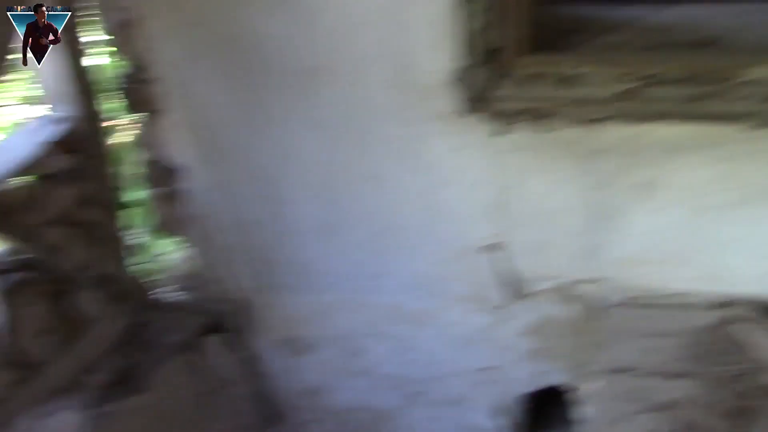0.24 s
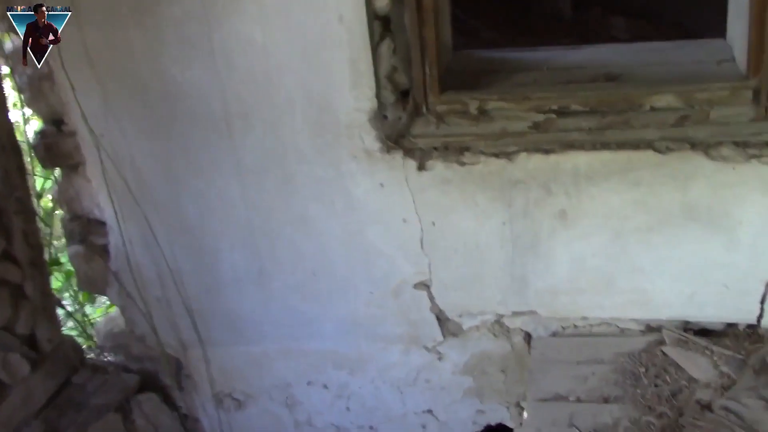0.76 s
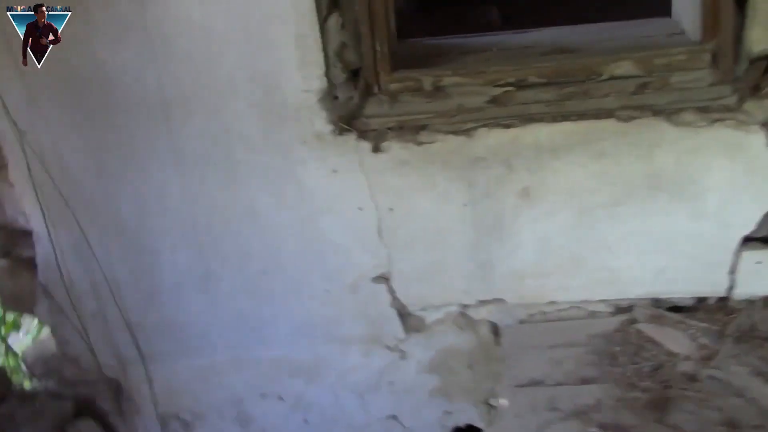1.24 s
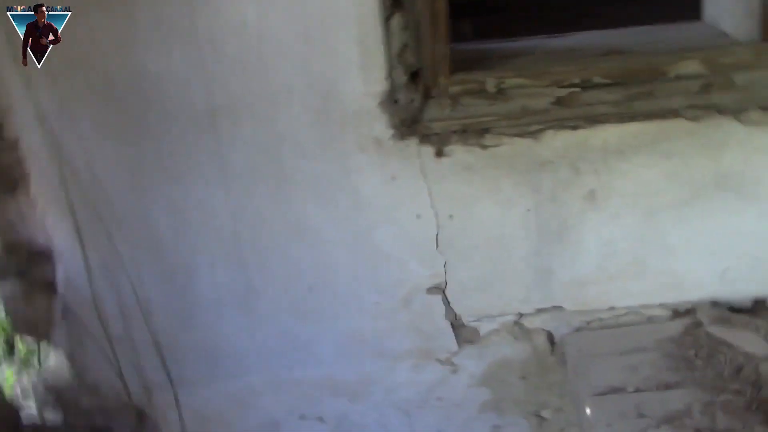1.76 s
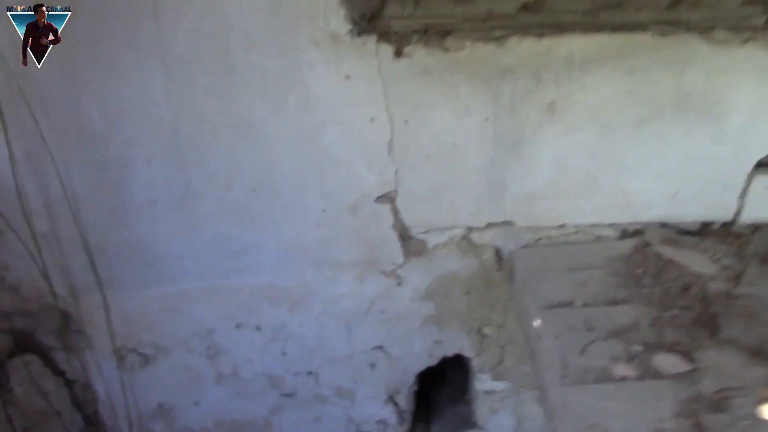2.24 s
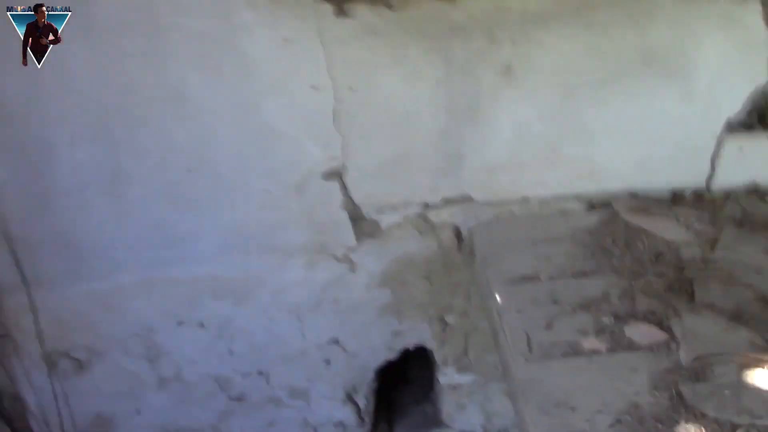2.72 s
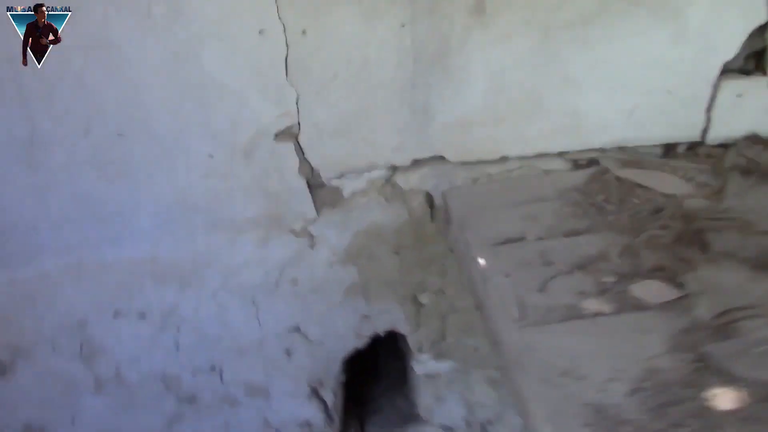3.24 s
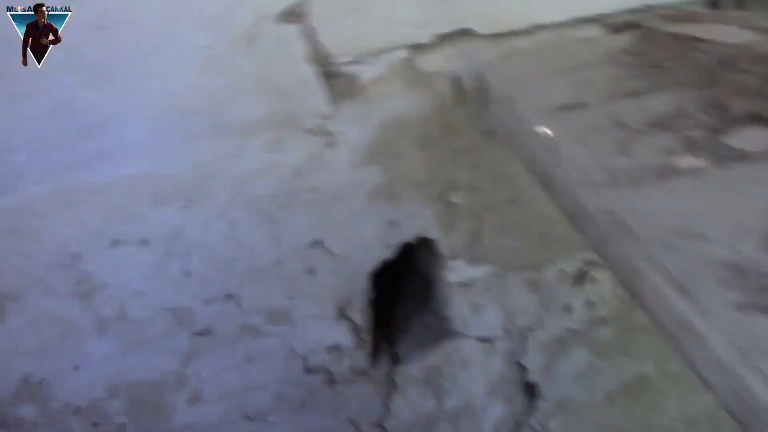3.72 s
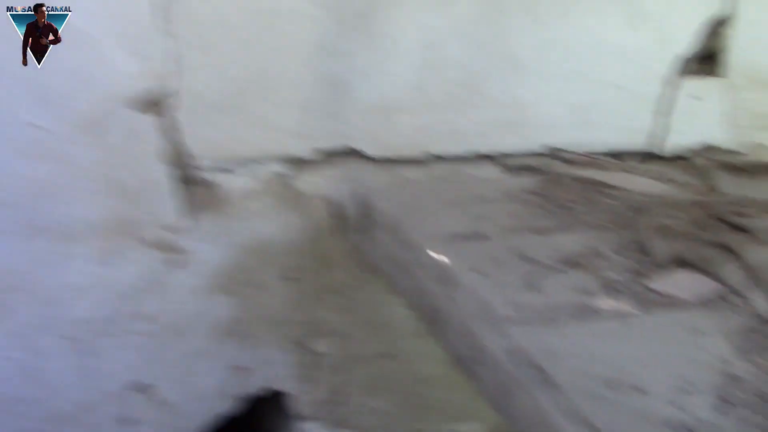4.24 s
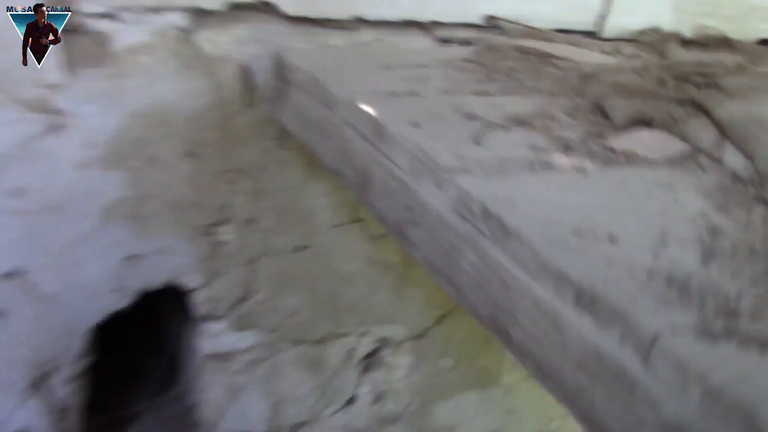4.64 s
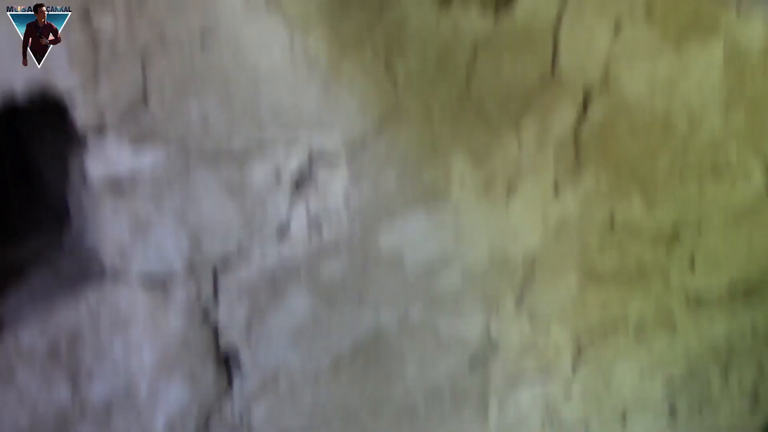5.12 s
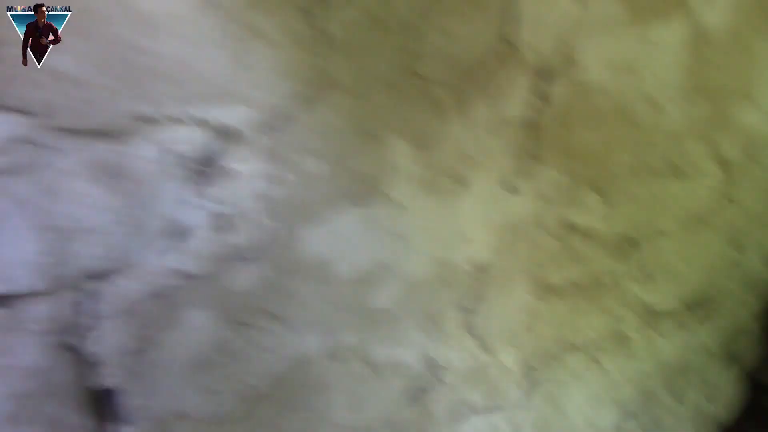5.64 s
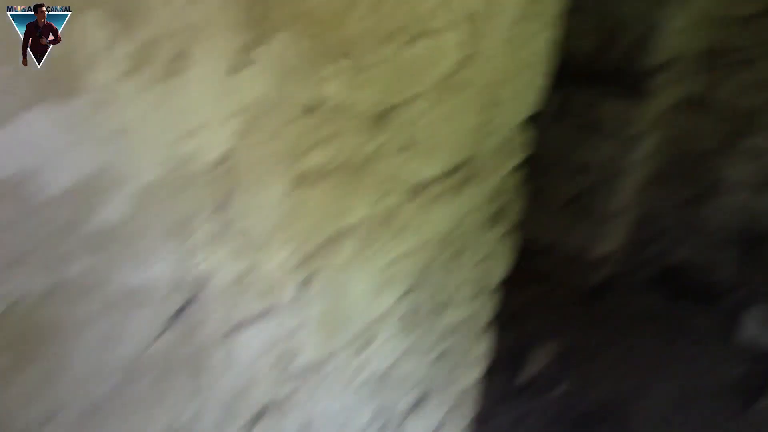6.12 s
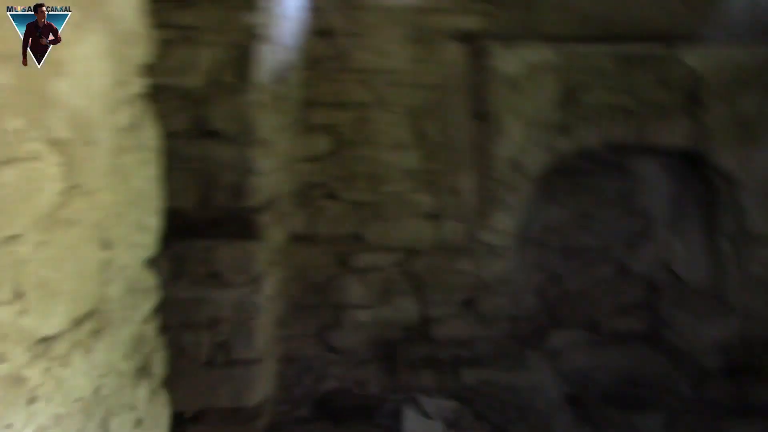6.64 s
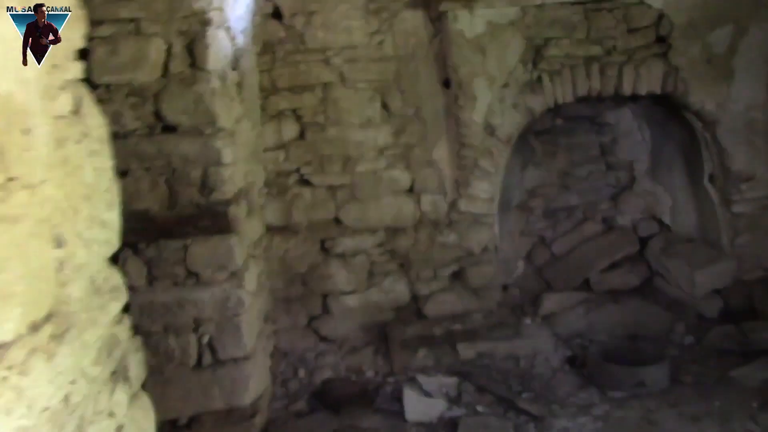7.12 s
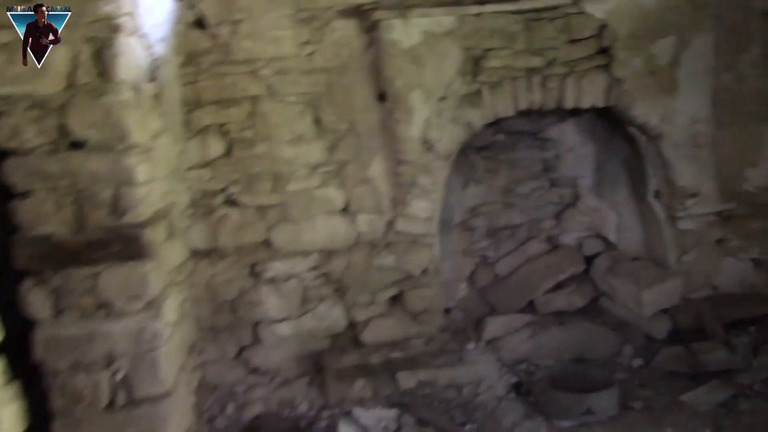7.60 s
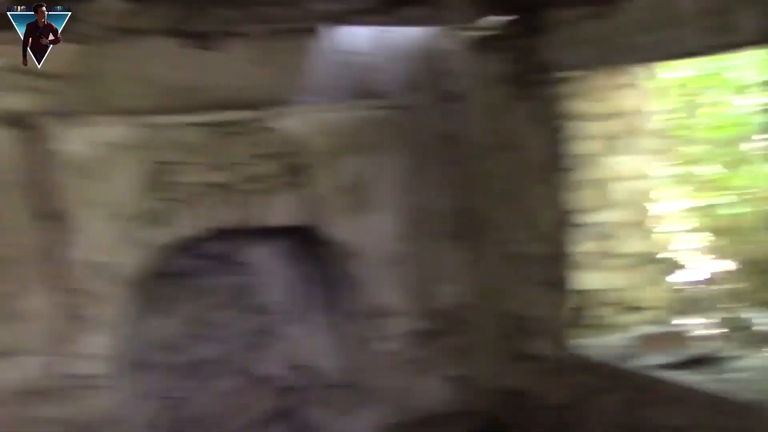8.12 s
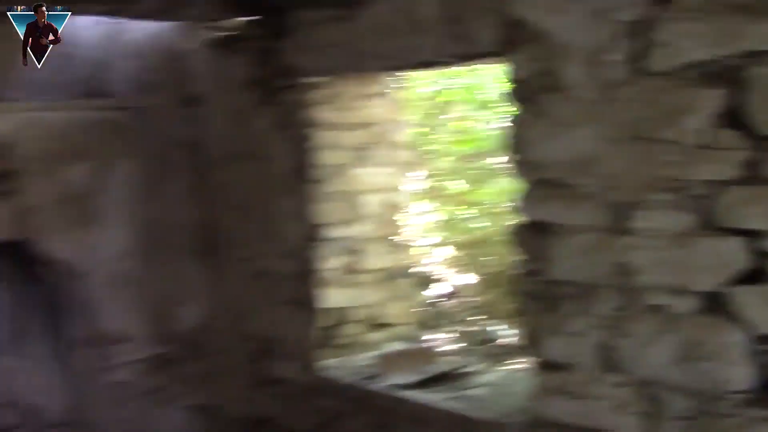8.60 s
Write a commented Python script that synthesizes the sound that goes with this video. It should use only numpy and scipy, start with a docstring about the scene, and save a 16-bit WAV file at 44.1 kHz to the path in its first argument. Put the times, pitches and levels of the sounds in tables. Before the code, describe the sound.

Close, handheld listening as one person walks slowly over rubble in a bare stone ruin. Gritty scuffs and stone knocks come first, then a slab grates in ringing jerks around two seconds. A hard clatter follows at three, faint squeaks fill a quieter middle, and heavy steps with sharp clicks land around six. Later movements are sparser, with a tiny creak. Soft outdoor hush and short echo throughout.

```python
"""Inside a roofless stone house, someone walks slowly over rubble, under a soft outdoor hush.
Soles scuff through grit (clouds of damped grains), and chips click (noise bursts through resonances).
Heels knock on loose stones (decaying modes with a burst of crushed grit) and thump the packed ground.
A slab is dragged in jerks and rings, shards squeak as gliding tones, and something creaks once by stick-slip.
Bare walls answer with a short decaying echo."""
import sys
import numpy as np
from scipy import signal
from scipy.fft import rfft, irfft, next_fast_len
from scipy.io import wavfile
from scipy.ndimage import uniform_filter1d, map_coordinates

SR = 44100
rng = np.random.default_rng(int(sys.argv[2]) if len(sys.argv) > 2 else 0)


def output_pcm(signal):
    """Save a mono or channel-first signal as 16-bit PCM at the path in sys.argv[1].

    Samples are clipped to [-1, 1] before scaling.
    """
    pcm = np.clip(np.atleast_2d(signal).T, -1, 1) * 32767
    wavfile.write(sys.argv[1], SR, np.round(pcm).astype(np.int16))


N = 390989  # samples


def amp(db):
    """The decibel law: a level in dB as an amplitude ratio."""
    return 10 ** (np.asarray(db) / 20)


def unit(x):
    """Normalization to a root-mean-square value of 1."""
    return x / np.sqrt(np.mean(x ** 2) + 1e-20)


def along(points, hz):
    """Interpolation of (frequency_hz, value) points on a logarithmic frequency axis."""
    f, v = np.transpose(points)
    return np.interp(np.log(hz + 1), np.log(f + 1), v)


def wobble(rate):
    """Slow random modulation: a smooth curve through `rate` random knots a second."""
    knots = rng.standard_normal(int(N * rate / SR) + 4)
    return map_coordinates(knots, [np.arange(N) * rate / SR])


def filtered(x, response):
    """Linear filtering: the spectrum of x times a (complex) response of frequency."""
    m = next_fast_len(N + SR // 2)  # room for ringing, so the end does not wrap to the start
    spectrum = rfft(x, m) * response(np.fft.rfftfreq(m, 1 / SR))
    return irfft(spectrum, m)[..., :N]


def without_bass(x, corner_hz):
    """Weak low-frequency radiation: three first-order high-pass stages."""
    return filtered(x, lambda hz: (1j * hz / (corner_hz + 1j * hz)) ** 3)


def body(modes):
    """Modal superposition: the causal response of a few resonances of alternating sign."""
    def response(f):
        total = 0
        for k, (centre, width, db) in enumerate(modes):
            resonance = 1j * f * width / (centre * centre - f * f + 1j * f * width)
            total = total + (-1) ** k * amp(db) * resonance
        return total
    return response


def hush():
    """Partial coherence of a diffuse field: distant air and leaves, partly unlike on the two sides."""
    # spectrum of the hush: frequency_hz, relative level_db (per Hz)
    spectrum = [(25, -20), (84, -7.5), (161, -6), (263, -2.5), (317, -4.5), (3250, -21), (8830, -31.5),
                (16000, -44)]
    # likeness of left and right: frequency_hz, correlation (1 = the same)
    likeness = [(60, 1), (950, 0.69), (3770, 0.76), (15000, 1.0)]
    level_db = -55.5

    def turn(hz):
        return np.arccos(np.clip(along(likeness, hz), -1, 1)) / 2

    def mid_side(hz):
        return amp(along(spectrum, hz)) * [np.cos(turn(hz)), np.sin(turn(hz))]

    mid, side = filtered(rng.standard_normal((2, N)), mid_side)
    sway_db = 1.3 * wobble(3.5)
    return amp(level_db + sway_db) * unit(np.array([mid + side, mid - side]))


def grains(hz, spread, cycles, spiky_db, count, size):
    """Granular superposition: stones touch at random moments, each a damped sine of its own pitch."""
    when, big = rng.random((2, count, 1))
    f = np.clip(hz * np.exp(spread * rng.standard_normal((count, 1))), 60, SR / 3)
    k = np.arange(size)
    turns = f * k / SR
    strength = amp(spiky_db * (2 * big - 1))
    damping = np.exp(-turns / cycles) * (1 - k / size)
    shape = strength * damping * np.sin(2 * np.pi * turns)
    places = (when * N).astype(int) + k
    return unit(np.bincount(places.ravel(), shape.ravel(), N + size)[:N])


def patchy(x, depth_db):
    """Spectral fluctuation: random gain in patches of time and pitch shifts the colour of a hiss."""
    z = signal.stft(x, nperseg=256)[2]
    field = uniform_filter1d(rng.standard_normal(z.shape), size=12, axis=0)
    field = uniform_filter1d(field, size=8, axis=1)
    return unit(signal.istft(z * amp(depth_db * unit(field)), nperseg=256)[1][:N])


def pressure():
    """Energy addition: scuffs swell and fade, and their powers add into gains of stones, pebbles, sand."""
    # soles rolling and sliding on rubble: loudest_s, swell_s, fade_s, stones_db, sand_db
    soles = [(0.12, 0.042, 0.57, -48, -61.5), (0.34, 0.045, 0.089, -33, -39.5),
             (0.382, 0.068, 0.18, -25, -41), (0.535, 0.15, 0.11, -27, -88), (0.92, 0.044, 0.22, -52, -62),
             (1.3, 0.2, 0.14, -42.5, -63.5), (1.592, 0.1, 0.19, -37, -48), (1.66, 0.06, 0.098, -47, -41.5),
             (1.82, 0.11, 0.072, -44.5, -41), (1.864, 0.034, 0.027, -46, -35), (2.04, 0.16, 0.06, -38, -39),
             (2.081, 0.053, 0.21, -31, -41), (2.2, 0.24, 0.46, -34.5, -39.5),
             (2.36, 0.25, 0.064, -34.5, -54.5), (2.45, 0.093, 0.14, -32, -46),
             (2.82, 0.049, 0.093, -49, -44), (2.97, 0.46, 0.11, -38.5, -44.5),
             (3.17, 0.18, 0.11, -38.5, -51.5), (3.3, 0.018, 0.023, -22, -41),
             (3.46, 0.18, 0.27, -38.5, -47), (3.55, 0.12, 0.11, -38, -47), (3.621, 0.02, 0.014, -52, -32),
             (3.72, 0.18, 0.16, -45.5, -49.5), (3.95, 0.17, 0.071, -52.5, -48),
             (4.12, 0.23, 0.18, -41.5, -52.5), (4.3, 0.25, 0.13, -41, -55), (4.92, 0.23, 0.19, -38, -64),
             (4.97, 0.12, 0.58, -52.5, -53.5), (5.345, 0.012, 0.12, -44.5, -48),
             (5.47, 0.03, 0.11, -42.5, -54.5), (5.63, 0.076, 0.52, -41, -59),
             (5.77, 0.21, 0.036, -38.5, -60.5), (6.02, 0.082, 0.076, -39, -67),
             (6.48, 0.089, 0.093, -29.5, -57), (6.534, 0.031, 0.038, -33, -41),
             (6.68, 0.22, 0.22, -43.5, -64), (6.92, 0.11, 0.17, -53.5, -57), (7.15, 0.095, 0.8, -45.5, -62),
             (7.61, 0.089, 0.13, -56, -61.5), (7.89, 0.093, 0.18, -42, -53.5),
             (8.68, 0.13, 0.19, -48.5, -68), (8.86, 0.12, 0.11, -46, -64)]
    # stirring that goes on between scuffs: level_db of stones, pebbles and sand
    stir_db = (-55.5, -66.5, -69.5)
    span_db = 20  # climb over one swell, or drop over one fade, before rounding
    rounding = 0.1  # share of swell and fade over which the top is rounded
    # pebbles lie this far from the stones' level towards the sand's, plus an offset in dB
    pebble_share, pebble_offset_db = 0.3, -4

    power = amp(stir_db)[:, None] ** 2 * np.ones(N)
    t = np.arange(N) / SR
    for s, swell, fade, stones_db, sand_db in soles:
        near = slice(max(round((s - 2 * swell) * SR), 0), round((s + 2 * fade) * SR))
        late = t[near] - s
        slope = np.maximum(-late / max(swell, .01), late / max(fade, .01))
        shape_db = -span_db * (np.hypot(slope, rounding) - rounding)
        pebbles_db = stones_db + pebble_share * (sand_db - stones_db) + pebble_offset_db
        levels_db = np.array([[stones_db], [pebbles_db], [sand_db]])
        power[:, near] += amp(shape_db + levels_db) ** 2
    return np.sqrt(power)


def scuffs():
    """Stick-slip over grains: big stones rumble, pebbles rattle and sand hisses, all in shared clumps."""
    # spectrum of the sand's hiss: frequency_hz, relative level_db (per Hz)
    sand_spectrum = [(1470, 4.5), (2500, 1), (3330, -1.5), (5690, 4), (6500, 1), (9580, -0.5), (13800, -3),
                     (16000, -13)]
    # patches of coarser or finer sand underfoot: from_s, to_s, change of the top octave_db
    patches = [(2.15, 2.903, -3.5), (4.05, 5.436, -13), (5.453, 5.656, 0), (5.688, 6.49, -0.5),
               (6.515, 6.6, 6)]

    catch_db = 2.2 * wobble(55)  # the sole catches and slips
    stones = grains(470, 0.565, cycles=2.26, spiky_db=3.5, count=5000, size=600)
    pebbles = grains(1995, 0.47, cycles=1.24, spiky_db=3.0, count=12000, size=200)
    specks = grains(6740, 0.52, cycles=5.7, spiky_db=6.5, count=9000, size=80)
    specks = rng.standard_normal(N) + 0.66 * specks
    sand = patchy(filtered(specks, lambda hz: amp(along(sand_spectrum, hz))), depth_db=3)

    fine_db = np.zeros(N)
    k = np.arange(N)
    for start, end, db in patches:
        fine_db += db * ((k > start * SR) & (k < end * SR))
    top = filtered(sand, lambda hz: 1 / (1 + (8000 / (hz + 1)) ** 6))
    sand = sand + top * (amp(uniform_filter1d(fine_db, size=900)) - 1)
    flickering_sand = amp(1.63 * wobble(60)) * sand
    return amp(catch_db) * (pressure() * [stones, pebbles, flickering_sand]).sum(0)


def chips():
    """Impulsive excitation: a sharp click and a short broad burst, strongest near the chip's pitch."""
    # chips of stone: start_s, peak level_db, pitch_hz
    snaps = [(0.1618, -32, 2200), (0.25, -35, 8000), (0.3042, -36, 5260), (0.609, -36, 1940),
             (0.709, -37, 8640), (0.758, -37, 2140), (1.79, -26, 5900), (2.075, -16, 9000),
             (2.6159, -34, 7160), (2.9763, -27, 3450), (3.1164, -23, 2130), (3.1485, -12, 2470),
             (3.282, -23.5, 2300), (3.308, -28, 2480), (4.771, -40, 2860), (5.625, -42.5, 1480),
             (5.9786, -15.5, 1810), (6.3464, -34.5, 2720), (6.431, -31, 4770), (6.483, -38, 2200),
             (6.501, -23, 1780), (6.5188, -9.5, 4900), (6.612, -21, 1700), (6.643, -31, 1700),
             (6.763, -33, 7030), (6.8042, -36, 7050), (6.9228, -32, 2310), (7.215, -32, 1700),
             (7.556, -35.5, 980), (7.8466, -29.5, 3930), (7.887, -27, 1630), (7.907, -30, 1900),
             (7.9443, -25, 1480), (8.0644, -24.5, 1330)]
    out, t = np.zeros(N + SR), np.arange(SR // 20) / SR
    decay = 0.15 * amp(-60 * t / 0.0028) + 0.063 * amp(-60 * t / 0.043)  # two 60 dB decay times, s
    for s, db, hz in snaps:
        force = rng.standard_normal(len(t)) * decay
        force[0] += .5  # the click
        peak = signal.iirpeak(hz, .8, SR)
        snap = signal.lfilter(*peak, signal.lfilter(*peak, force))
        out[round(s * SR):][:len(t)] += amp(db) * snap / np.abs(snap).max()
    return out[:N]


def knocks():
    """Modal impact: each blow rings a stone near its pitch and crushes grit in a dying burst."""
    # heel and stone knocks: start_s, peak level_db of the stone before the bass cut, pitch_hz,
    # crunch level_db (relative to the blow)
    blows = [(0.372, -30.5, 990, 11.5), (0.398, -19.5, 472, 2.5), (0.513, -16, 699, 2.5),
             (0.659, -27, 453, -8), (0.798, -36, 450, -1), (0.873, -30.5, 465, -10),
             (1.186, -17.5, 300, -14), (2.072, -20, 604, -7), (2.388, -15, 402, -14),
             (2.394, -23.5, 1010, -15), (2.426, -26, 793, 0.5), (2.444, -21, 475, -3.5),
             (2.535, -25, 748, -7), (2.852, -26.5, 777, 0), (2.917, -27, 1064, -19),
             (3.149, -20.5, 596, 1.5), (3.274, -8.5, 267, -30), (3.277, -20, 549, -14),
             (3.291, -15.5, 330, -3.5), (4.0531, -13, 288, -28), (4.0545, -18, 560, -19),
             (4.785, -22.5, 312, -15), (5.416, -26, 422, -4), (5.537, -26, 297, -13),
             (5.702, -36, 550, 5.5), (5.736, -30.5, 580, 0), (5.977, -19, 593, -3),
             (6.4012, -11.5, 555, -7.5), (6.4025, -11, 201.6, -15), (6.5, -18, 429, -8),
             (6.519, -18.5, 523, -3.5), (6.615, -25, 478, 0.5), (7.095, -16.5, 327, -22.5),
             (7.1, -20.5, 537, -31), (7.226, -28.5, 740, -4.5), (7.811, -19.5, 565, -9.5),
             (8.61, -32.5, 343, -1), (8.682, -38, 398, -5.5)]
    # spectrum of crushed grit: frequency_hz, relative level_db (per Hz)
    crunch = [(150, 1), (400, 10.5), (1200, 4), (3000, -15), (7000, -50), (15000, -97)]
    ring_s, ring_falls = 0.072, 0.27  # 60 dB decay of a 400 Hz stone; power of pitch that shortens it
    attack_cycles = 0.15  # a blow builds up within a fraction of a cycle of its pitch

    stone, burst, t = np.zeros(N + SR), np.zeros(N + SR), np.arange(SR // 4) / SR
    for s, db, hz, crunch_db in blows:
        t60 = ring_s * (400 / hz) ** ring_falls
        fall = amp(db - 60 * t / t60) * (1 - np.exp(-t * hz / attack_cycles)) ** 2
        # the stone rocks on its bed: phases drift
        rock = 0.023 * np.cumsum(rng.standard_normal((13, len(t))), axis=1)
        ring = np.sin(2 * np.pi * hz * t + rock[0])
        # further modes, as multiples of the pitch; higher ones are weaker and die sooner
        ratio = np.exp(0.296 + .5 * rng.standard_normal((12, 1)))
        fade = amp(-60 * t * np.maximum(ratio - 1, 0) / t60) / np.maximum(ratio, 1)
        phase = 2 * np.pi * hz * ratio * t + rock[1:] + 2 * np.pi * rng.random((12, 1))
        ring += 0.35 * (fade * np.sin(phase)).sum(0)
        at = slice(round(s * SR), round(s * SR) + len(t))
        stone[at] += amp(db) * ring * fall / np.abs(ring * fall).max()
        burst[at] += amp(crunch_db) * fall
    grit = unit(filtered(rng.standard_normal(N), lambda hz: amp(along(crunch, hz))))
    return without_bass(stone[:N] + burst[:N] * grit, 140)  # small stones radiate little bass


def thuds():
    """Heavy damping: the heel's weight thumps packed ground, which gives softly and dies fast."""
    # thumps: start_s, level_db, pitch_hz
    thumps = [(1.19, -36, 150), (3.285, -23, 190), (4.056, -27.5, 158), (5.54, -21, 151), (5.646, -31, 124),
              (5.958, -34, 125), (5.979, -15.5, 119), (6.4007, -8, 163), (6.485, -17, 157),
              (6.519, -22.5, 153), (7.104, -23, 112)]
    # modes of the ground: ratio to the pitch, relative level_db, 60 dB decay time_s
    ground = [(1, 3, 0.052), (.62, -17.5, 0.17)]
    out, t = np.zeros(N + SR), np.arange(SR // 4) / SR
    onset = 1 - np.exp(-t / 0.0029)
    for s, db, hz in thumps:
        ring = np.zeros(len(t))
        for ratio, mode_db, t60 in ground:
            ring += amp(db + mode_db - 60 * t / t60) * np.sin(2 * np.pi * hz * ratio * t)
        out[round(s * SR):][:len(t)] += ring * onset
    return out[:N]


def slab():
    """Friction-driven resonance: gritty rubbing rings the slab jerk by jerk; its tilt shifts the modes."""
    # modes of the slab: frequency_hz, width_hz, relative level_db
    modes = [(447, 380, 3), (963, 27, 22), (1174, 180, 6), (2100, 840, -9), (5300, 230, -12.5),
             (7030, 170, -12)]
    # jerks of the sliding slab: start_s, length_s, level_db, pitch ratio of the modes
    jerks = [(2.01, 0.021, -40, 1.04), (2.087, 0.032, -30.5, 1.08), (2.115, 0.017, -23, 0.96),
             (2.148, 0.0067, -18, 1.014), (2.175, 0.055, -28, 1.07), (2.253, 0.024, -23, 0.98),
             (2.31, 0.037, -28, 0.98)]
    attack_s, release_s = 0.0034, 0.012
    t, out = np.arange(N) / SR, np.zeros(N)
    roughness_db = 1.9 * wobble(90) + 0.77 * rng.exponential(size=N)
    rub = amp(roughness_db) * rng.standard_normal(N)
    for s, length, db, tilt in jerks:
        rise = np.clip((t - s) / attack_s, 0, 1)
        grip = amp(db) * rise * np.exp(-np.maximum(t - s - length, 0) / release_s)
        out += grip * unit(filtered(rub, lambda hz: body(modes)(hz / tilt)))
    return out


def shard():
    """Single-mode friction: brief rubs sound a fluttering, slightly hoarse tone that glides."""
    # thin shards squeaking under the sole: start_s, length_s, level_db, first pitch_hz, last pitch_hz
    rubs = [(3.438, 0.17, -50, 2100, 2120), (4.115, 0.16, -55.5, 2650, 2580), (4.7, 0.11, -46, 1280, 1520),
            (5.1, 0.034, -46.5, 2700, 2640), (4.945, 0.045, -50, 2930, 3300),
            (5.025, 0.043, -52, 2850, 2800), (5.01, 0.072, -57.5, 4480, 4420),
            (5.345, 0.054, -59, 3500, 3500), (5.343, 0.049, -53, 3000, 2780),
            (2.44, 0.021, -32.5, 2180, 2090)]
    out, flutter = np.zeros(N), amp(3.5 * wobble(70))
    for s, length, db, from_hz, to_hz in rubs:
        t = np.arange(round(length * SR)) / SR
        hoarse = 0.11 * np.cumsum(rng.standard_normal(len(t)))  # phase drift, radians
        mean_hz = from_hz + (to_hz - from_hz) * t / length / 2  # mean pitch since the start
        squeak = np.sin(2 * np.pi * mean_hz * t + hoarse)
        ramps = np.clip(np.minimum(t, length - t) / 0.0029, 0, 1)
        out[round(s * SR):][:len(t)] += amp(db) * ramps * unit(squeak)
    return out * flutter


def creak():
    """Stick-slip: a short run of uneven slips drives stiff resonances, slowing as it grows louder."""
    # resonances of what creaks: frequency_hz, width_hz, relative level_db
    resonances = [(2200, 210, 4), (2630, 460, 5), (3500, 180, 4)]
    start_s, end_s = 7.48, 7.652
    t = np.arange(N) / SR
    db = np.interp(t, [start_s, end_s], [-54.5, -43.5])
    slips_per_s = np.interp(t, [start_s, end_s], [160, 62])
    uneven = 0.14 * wobble(80)
    slip_count = np.floor(np.cumsum(slips_per_s * (1 + uneven)) / SR)
    slips = np.diff(slip_count, prepend=0) * amp(2 * rng.standard_normal(N))
    sounding = (t > start_s) & (t < end_s)
    return amp(db) * unit(filtered(slips, body(resonances))) * sounding


def walls(x):
    """Reverberation: decaying noise as echo, alike on both sides in the bass; the treble dies first."""
    # difference between the sides in the echo: frequency_hz, side over mid level_db
    spread = [(200, -31), (1500, -15.5), (5000, -10), (14000, -20)]
    # decay of the echo: frequency_hz, 60 dB decay time_s
    decay = [(120, 0.34), (700, 0.16), (2500, 0.12), (10000, 0.088)]
    out, step = np.zeros((2, N + 2 * SR)), SR // 3
    # the walker moves, so each third of a second has an echo of its own
    for at in range(0, N, step):
        hz, t, z = signal.stft(rng.standard_normal((2, SR // 2)), SR, nperseg=256)
        z[1] *= amp(along(spread, hz))[:, None]
        fall = amp(-60 * t / along(decay, hz)[:, None])
        mid, side = signal.istft(z * fall, SR, nperseg=256)[1]
        tail = np.array([mid + side, mid - side]) / np.linalg.norm(mid)
        echo = signal.fftconvolve(x[None, at:at + step], tail, axes=1)
        out[:, at:at + echo.shape[1]] += echo
    return np.pad(out, ((0, 0), (200, 0)))[:, :N]  # the echo starts 200 samples late


def scene():
    """Superposition: contact sounds, their echo and the hush add at two close-set listening points."""
    rubbing = scuffs() + slab() + shard() + creak()
    feet = without_bass(rubbing, 150) + knocks() + thuds() + chips()
    feet = without_bass(feet, 66)  # rubble carries no deep bass
    # a slope added to one side and taken from the other is a tiny delay: contacts lie now left, now right
    lag = 0.21 * np.gradient(feet) * wobble(6)
    balance = amp([[.4], [-.4]])  # left slightly louder, dB
    return (feet + [lag, -lag] + amp(-9.5) * walls(feet) + hush()) * balance


def record(dry):
    """Band limitation: nothing passes above a sharp upper edge."""
    top_hz = 15900
    return filtered(dry, lambda hz: hz < top_hz)


dry = scene()
out = record(dry)
output_pcm(out)
```